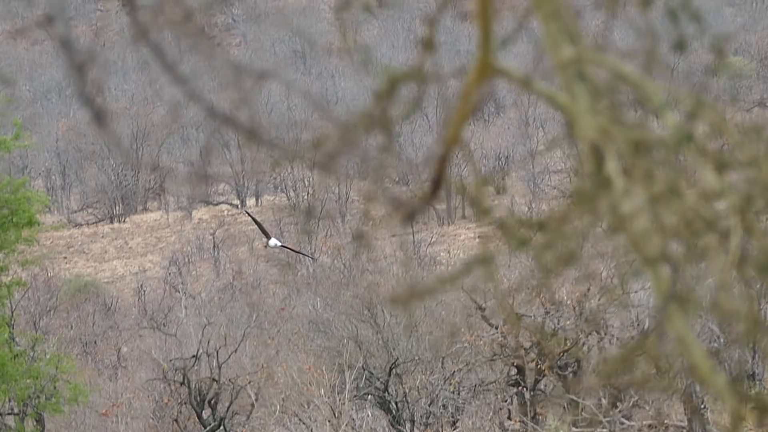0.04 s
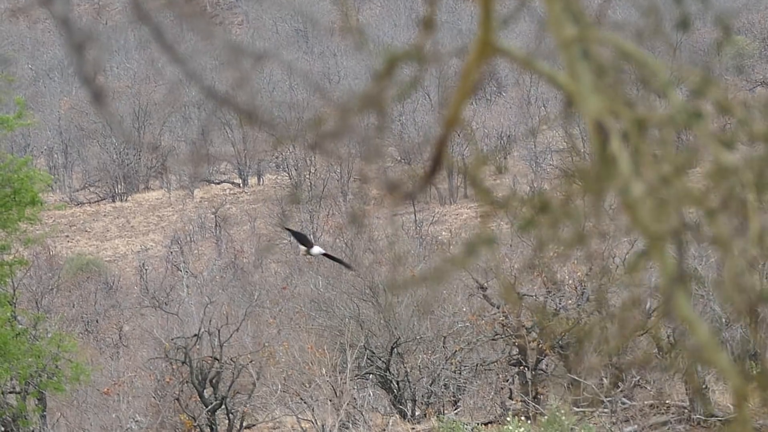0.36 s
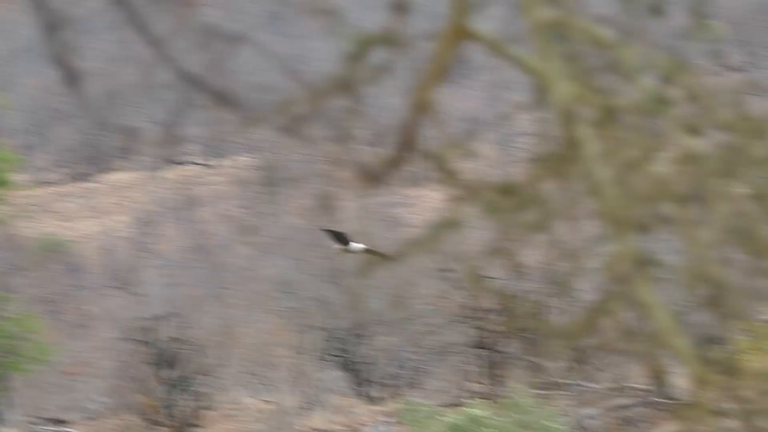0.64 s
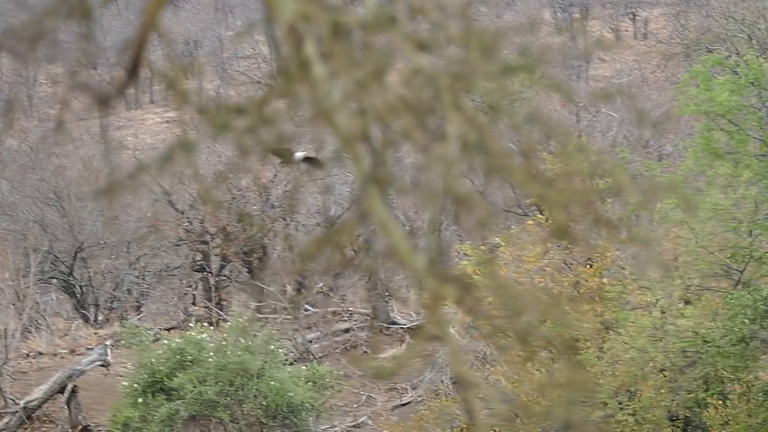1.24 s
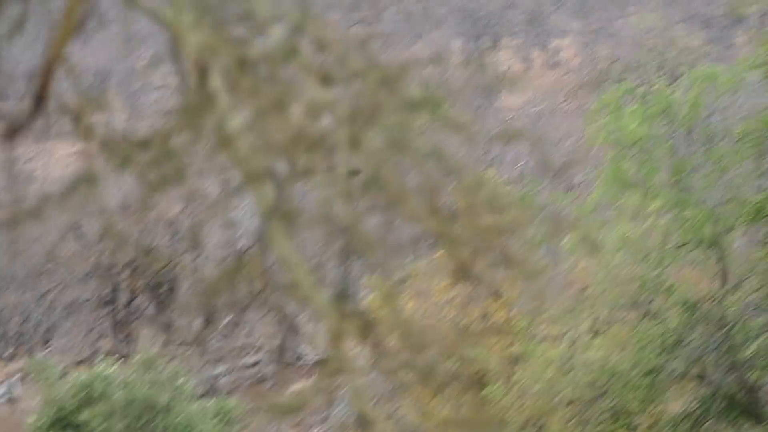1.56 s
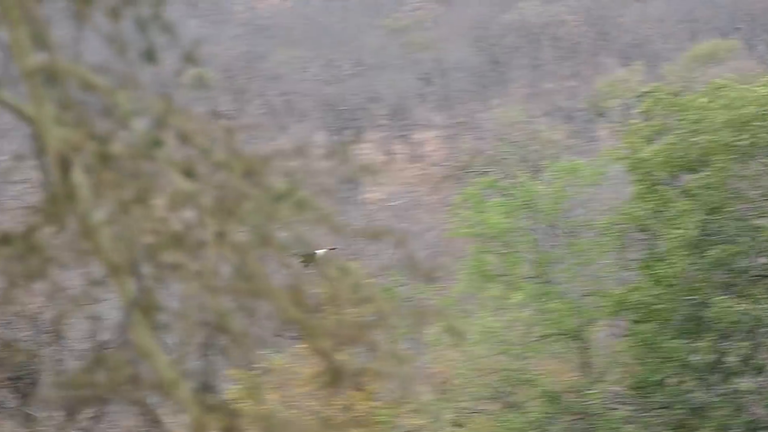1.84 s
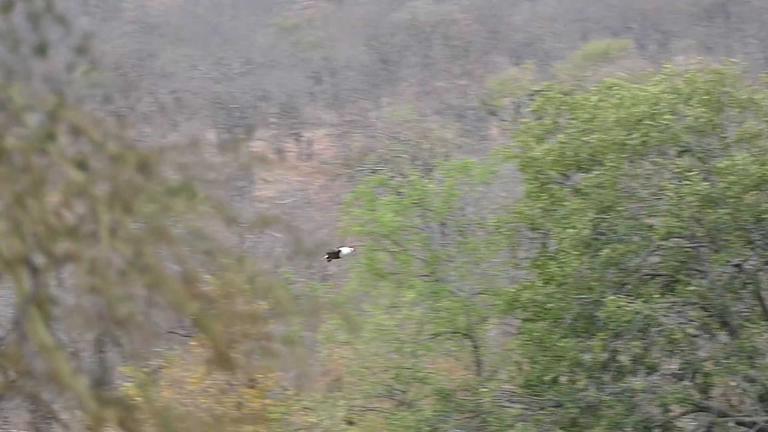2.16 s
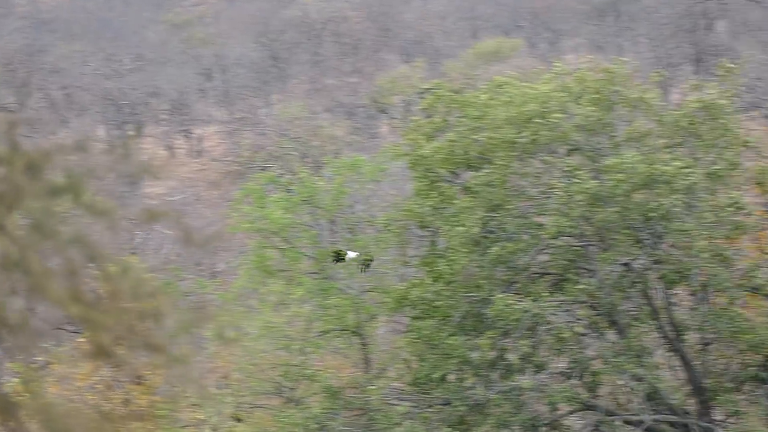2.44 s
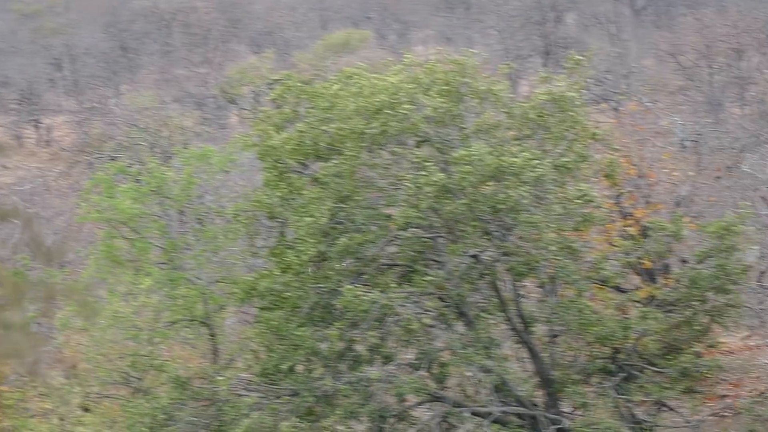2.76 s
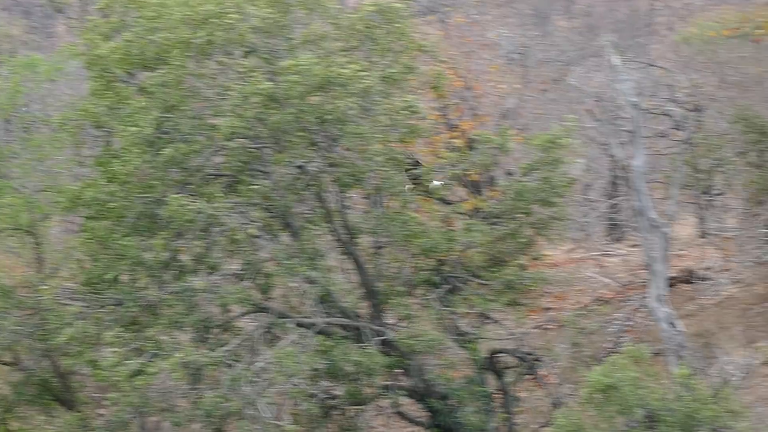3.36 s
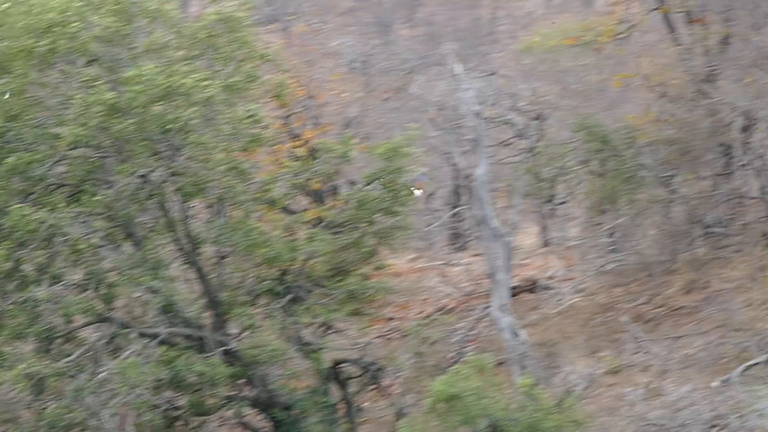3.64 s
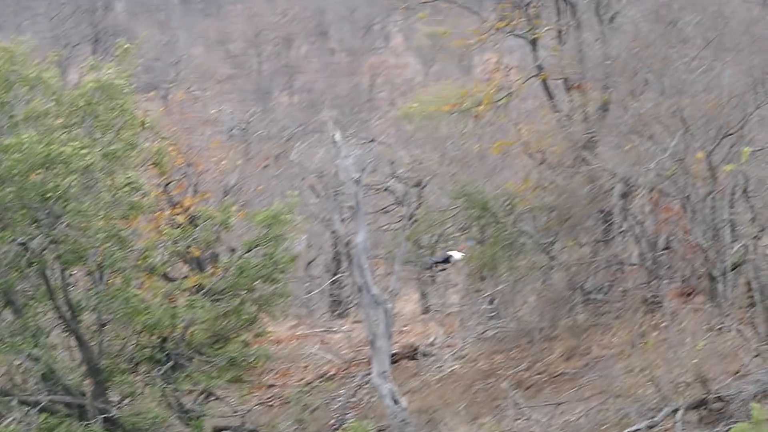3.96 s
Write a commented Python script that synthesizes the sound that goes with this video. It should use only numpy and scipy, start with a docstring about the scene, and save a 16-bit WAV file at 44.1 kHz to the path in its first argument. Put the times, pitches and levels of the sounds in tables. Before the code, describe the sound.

Small birds chirping and whistling in short bursts outdoors, above faint wind or traffic.

```python
"""Dry bush, on a hand-held camera's microphone. Close by, small birds twitter: quick falling chips and
louder rising whistles, nearly pure tones scattered by the trees. Fainter birds chatter behind them.
Far off are a few low hoots and a steady rush, wind or traffic, that swells a little towards the end.
Something dry ticks nearby, and the camera is softly bumped and scuffed. Only a faint hiss has
stereo width; the camera's filters cut two narrow bands and the top."""
import sys
import numpy as np
from scipy import signal
from scipy.fft import rfft, irfft
from scipy.io import wavfile
from scipy.ndimage import map_coordinates

SR = 44100
rng = np.random.default_rng(int(sys.argv[2]) if len(sys.argv) > 2 else 0)


def wav_record(signal):
    """Record a signal, one row per channel, as 16-bit PCM in the file named by sys.argv[1]."""
    frames = np.transpose(np.atleast_2d(signal))
    bounded = np.clip(frames, -1, 1)
    # unit amplitude maps onto the largest positive 16-bit level
    quanta = np.round(bounded * 32767).astype(np.int16)
    wavfile.write(sys.argv[1], SR, quanta)


N = 176400


def undb(db):
    """Decibels to gain."""
    return 10 ** (np.asarray(db) / 20)


def colour(x, points):
    """Filter by a curve of points: f/Hz, gain/dB."""
    hz, db = np.array(points).T
    bins_hz = np.maximum(np.fft.rfftfreq(N, 1 / SR), 1)
    return irfft(rfft(x) * undb(np.interp(np.log(bins_hz), np.log(hz), db)), N)


def noise():
    """White noise at 0 dB per Hz."""
    return rng.standard_normal(N) * np.sqrt(SR / 2)


def walk(rate_hz):
    """Smooth random motion with a spread of 1."""
    knots = rng.standard_normal(8192)
    motion = map_coordinates(knots, [np.arange(N) / SR * rate_hz], order=1, mode="mirror")
    return motion / motion.std()


def bell(peak_s, sigma_s):
    """A Gaussian rise and fall around a time."""
    return np.exp(-((np.arange(N) / SR - peak_s) / sigma_s) ** 2 / 2)


def add(out, start_s, sound):
    """Mix a sound in at a time."""
    i = int(np.clip(start_s * SR, 0, N))
    out[i:i + len(sound)] += sound[:N - i]


def progress(length_s):
    """0 to 1 over a note."""
    return np.linspace(0, 1, max(int(length_s * SR), 8))


def echoes(x, t60_s):
    """A diffuse tail of unit energy."""
    t = np.arange(SR) / SR
    tail = rng.standard_normal(SR) * np.exp(-np.log(1000) * t / t60_s) * (1 - np.exp(-t / 0.0025))
    return signal.fftconvolve(x, tail / np.linalg.norm(tail))[:N]


def bursts(events):
    """Noise that rises quickly and dies away, once for each row: t/s, decay/s, level/dB."""
    out = np.zeros(N)
    t = np.arange(SR // 4) / SR
    for start, decay, db in events:
        envelope = np.exp(-t / decay) * (1 - np.exp(-t / (0.09 * decay)))
        add(out, start, undb(db) * envelope * rng.standard_normal(len(t)))
    return out


def note(hz, attack=0.21, release=0.55, jitter=0.01, wobble_hz=260, flutter_db=2.5):
    """A slightly unsteady tone. Attack and release are shares of its length, jitter of its pitch."""
    u = np.linspace(0, 1, len(hz))
    position = np.arange(len(hz)) / SR * wobble_hz
    wobble, flutter = (np.interp(position, np.arange(128), r) for r in rng.standard_normal((128, 2)).T)
    fade_in = np.sin(np.pi / 2 * np.clip(u / attack, 0, 1))
    fade_out = np.sin(np.pi / 2 * np.clip((1 - u) / release, 0, 1))
    phase = 2 * np.pi * np.cumsum(hz * (1 + jitter * wobble)) / SR
    return fade_in * fade_out * undb(flutter_db * flutter) * np.sin(phase)


def chip(length_s, high_hz, low_hz, bend):
    """A quick downward slur: bend 1 is straight, over 1 flattens out, under 1 steepens."""
    u = progress(length_s)
    fall = 1 - (1 - u) ** bend if bend >= 1 else u ** (1 / bend)
    return note(high_hz + (low_hz - high_hz) * fall)


def faint_wide_hiss():
    """A faint hiss, independent left and right."""
    # hiss spectrum: f/Hz, level/dB per Hz
    spectrum = [(20, -120), (120, -115), (400, -104), (1500, -105), (3500, -110), (5000, -110),
                (7000, -120), (8200, -115), (9500, -107), (10500, -107), (12000, -113.5), (15500, -121)]
    return np.array([colour(noise(), spectrum) for _ in range(2)])


def distant_rush(bands=9, breath_db=0.23, flicker_db=1.08):
    """Far wind or traffic: octave bands breathe together and flicker alone; resonances swell and fade."""
    # steady spectrum: f/Hz, level/dB per Hz
    steady = [(20, -134), (70, -126), (125, -108), (165, -98.5), (270, -79), (380, -77), (460, -72.5),
              (700, -74), (820, -79.5), (1000, -79.5), (1170, -84.5), (1330, -79), (1520, -76.5),
              (1800, -80), (2130, -83), (2450, -93.5), (3300, -93.5), (4200, -86), (5700, -95),
              (7000, -109), (9500, -102.5), (12000, -113), (15000, -122)]
    # swelling bands: peak t/s, sigma/s, f/Hz, width/Hz, level/dB per Hz
    swells = [(0.32, 1, 1292, 200, -78), (.3, 0.81, 443, 55, -73), (1.76, 0.55, 786, 240, -77.5),
              (1.95, 0.25, 1570, 370, -82), (4.16, 0.74, 676, 198, -70.5), (3.64, 0.89, 523, 65, -73),
              (4.33, 0.8, 1690, 720, -79.5), (3.88, 0.48, 4400, 1630, -87.5),
              (3.85, 0.41, 9500, 2400, -105)]
    spectrum = rfft(colour(noise(), steady))
    breath = breath_db * walk(2.63)
    bins_hz = np.maximum(np.fft.rfftfreq(N, 1 / SR), 1)
    octave = np.clip(np.log2(bins_hz / 50), 0, bands - 1)
    out = np.zeros(N)
    for k in range(bands):
        band = irfft(spectrum * np.maximum(1 - abs(octave - k), 0), N)
        out += band * undb(breath + flicker_db * walk(14))
    for peak, sigma, hz, width, db in swells:
        bandpass = signal.butter(2, [hz - width / 2, hz + width / 2], "band", fs=SR, output="sos")
        out += undb(db) * bell(peak, sigma) * signal.sosfilt(bandpass, noise())
    return out


def midrange_dip(x, hz=1095, width_hz=200, depth=0.68):
    """A narrow band in the middle fades and comes back."""
    band = signal.lfilter(*signal.iirpeak(hz, hz / width_hz, fs=SR), x)
    return x - depth * bell(peak_s=1.4, sigma_s=0.44) * band


def far_hoots():
    """Short low calls from far off, some clear and some hoarse, with a little echo."""
    # hoots: centre t/s, length/s, f/Hz, jitter/share of pitch, level/dB
    calls = [(0.276, 0.033, 1210, .008, -40), (0.284, 0.058, 764, 0.009, -39.5),
             (1.86, .042, 872, .11, -42), (1.863, .018, 1360, 0.13, -44.5), (2.307, .036, 660, .037, -43.5)]
    out = np.zeros(N)
    for centre, length, hz, jitter, db in calls:
        hoot = note(np.full_like(progress(length), hz), attack=0.43, release=0.42, jitter=jitter)
        add(out, centre - length / 2, undb(db) * hoot)
    return out + undb(-3) * echoes(out, t60_s=0.083)


def far_chatter(count=100, centre_hz=4234, level_db=-60.5):
    """Faint chips from the rest of the flock, further back in the bush."""
    out = np.zeros(N)
    for k, (shift, stretch, pitch, loudness) in enumerate(rng.uniform(-1, 1, (count, 4))):
        hz = centre_hz * (1 + 0.1023 * pitch)
        call = chip(0.0349 * (1 + stretch / 2), hz, hz * 0.94, bend=1.39)
        add(out, (k + shift) / count * N / SR, undb(level_db + 3.2 * loudness) * call)
    return out


def dry_ticks():
    """Something dry ticks near the microphone: short, bright bursts of noise."""
    # ticks: t/s, decay/s, level/dB before colouring
    ticks = [(.044, .005, -56), (.318, .006, -55), (.378, .01, -59), (1.277, .02, -58),
             (1.348, .006, -56.5), (1.528, 0.036, -61), (1.618, .011, -57.5), (1.663, .01, -61),
             (1.715, .014, -56.5), (1.856, .02, -63), (2.972, 0.0054, -53), (3.002, 0.0048, -50),
             (3.074, .007, -55.5)]
    # their bright colour: f/Hz, gain/dB
    bright = [(3000, -25), (6000, -4), (7200, -6.5), (9500, 10.5), (12000, 0), (15500, -22)]
    return colour(bursts(ticks), bright)


def camera_bumps(decay_s=0.015):
    """Soft knocks on the camera body reach the microphone as dull thuds."""
    # knocks: t/s, level/dB before colouring
    knocks = [(3.450, -48), (3.503, -53), (3.522, -57)]
    # their dull colour: f/Hz, gain/dB
    dull = [(30, -25), (75, -5), (125, 15), (190, 24.5), (260, 24), (400, -5), (1500, -50)]
    return colour(bursts((start, decay_s, db) for start, db in knocks), dull)


def grip_scuffs():
    """The hand rubs briefly on the grip, right by the microphone."""
    # scuffs: t/s, decay/s, level/dB before colouring
    scuffs = [(3.538, 0.012, -52.5), (3.554, 0.0076, -51.5)]
    # their hissy colour: f/Hz, gain/dB
    hissy = [(2500, -30), (5500, 10), (7000, 4), (9500, 2.5), (13000, -20)]
    return colour(bursts(scuffs), hissy)


def trees(x):
    """A short hazy smear, blurred in pitch, follows each note; trunks add a fainter, longer tail."""
    haze = echoes(x * walk(840), t60_s=0.22)
    trunks = echoes(x, t60_s=0.3)
    return x + undb(-11.5) * haze + undb(-20.5) * trunks


def branches(sound, count=3, reflection_db=-15):
    """A note also reaches the microphone by way of a few branches; the copies beat against its glide."""
    direct = np.pad(sound, (0, SR // 20))
    delays_s = rng.uniform(0.0024, 0.011, count)
    return direct + undb(reflection_db) * sum(np.roll(direct, int(delay * SR)) for delay in delays_s)


def near_scratches(length_s=0.015):
    """Tiny notes from the near birds, made scratchy by fast, wide pitch jitter."""
    # scratchy notes: centre t/s, f/Hz, level/dB
    calls = [(.672, 5400, -55), (1.020, 4850, -50), (1.29, 5300, -49.5), (1.286, 4900, -50),
             (1.573, 3590, -48), (1.590, 4440, -43), (1.607, 4640, -45), (1.617, 4780, -48),
             (1.640, 4180, -50), (1.880, 4980, -52), (2.264, 4215, -43.5), (2.316, 4300, -48),
             (2.982, 5300, -48), (3.001, 5450, -47), (3.798, 5600, -52), (3.804, 4220, -48),
             (3.816, 5650, -46.5), (3.835, 5600, -53)]
    out = np.zeros(N)
    for centre, hz, db in calls:
        pitch = np.full_like(progress(length_s), hz)
        scratch = note(pitch, attack=0.58, release=0.44, jitter=0.068, wobble_hz=965)
        add(out, centre - length_s / 2, undb(db) * scratch)
    return out


def near_rasps():
    """Rough falling slurs that close the loud whistles."""
    # rasps: t/s, length/s, start f/Hz, end f/Hz, level/dB
    calls = [(0.671, 0.03, 4980, 3580, -41.5), (1.288, 0.032, 4830, 3640, -40),
             (1.884, .023, 4660, 3500, -40.5)]
    out = np.zeros(N)
    for start, length, high, low, db in calls:
        slur = low + (high - low) * (1 - progress(length)) ** 1.8
        add(out, start, undb(db) * branches(note(slur, jitter=0.026, wobble_hz=690)))
    return out


def near_chips():
    """Quick falling chips from the birds closest to the microphone."""
    # chips: t/s, length/s, start f/Hz, end f/Hz, bend, level/dB
    calls = [(.054, .04, 5600, 4600, .94, -54), (.148, .048, 5680, 4400, 1.3, -53),
             (.248, 0.038, 4450, 3560, 1.5, -47.5), (.358, 0.042, 4480, 3440, 0.8, -46.5),
             (.466, .026, 5300, 4300, 1, -49), (.522, 0.022, 5080, 4520, 1.1, -47.5),
             (.540, 0.041, 4450, 3540, 1.1, -45), (.880, 0.05, 4420, 3440, 1.3, -54),
             (1.030, 0.013, 4420, 3690, 1.12, -48), (1.544, 0.016, 4480, 3090, 0.56, -45),
             (1.569, 0.021, 6100, 4500, 0.86, -55), (1.606, 0.02, 5550, 5350, .8, -47),
             (1.637, 0.037, 3640, 3170, 1.8, -56), (1.683, 0.026, 5450, 4600, 1.3, -55),
             (1.71, 0.038, 5650, 4370, 2.3, -47), (1.752, 0.06, 4600, 3780, 0.41, -43.5),
             (1.860, .026, 4520, 4200, 1.5, -43.5), (1.901, .023, 4040, 3540, 0.91, -49),
             (2.218, 0.041, 4370, 3700, 1.3, -53), (2.366, .052, 5530, 3600, 0.82, -58),
             (2.843, 0.041, 4650, 3380, .95, -45), (2.956, 0.039, 4570, 3410, 1.17, -42.5),
             (3.065, 0.038, 5550, 3990, 1.5, -41.5), (3.127, 0.063, 5300, 3680, 2.24, -43.5),
             (3.263, .022, 5500, 4350, 1.5, -53), (3.286, 0.043, 4680, 3900, 0.98, -48),
             (3.340, 0.066, 4760, 4116, 2.8, -50), (3.401, 0.049, 4100, 4020, 1.9, -55),
             (3.474, 0.043, 4100, 3390, 1, -52.5), (3.500, 0.026, 5750, 5150, 1.2, -54),
             (3.560, 0.038, 4980, 4970, 1.1, -50.5), (3.686, 0.061, 4380, 3500, 0.65, -45.5)]
    out = np.zeros(N)
    for start, length, high, low, bend, db in calls:
        add(out, start, undb(db) * branches(chip(length, high, low, bend)))
    return out


def near_whistles(fade_db=2.5):
    """The loudest calls, close by: the pitch climbs in an S and the tone loses level on the way up."""
    # whistles: t/s, length/s, low f/Hz, high f/Hz, top of the climb/share of note, level/dB
    calls = [(0.576, 0.073, 3904, 4790, 0.76, -34), (1.196, .067, 3900, 4720, .9, -36.5),
             (1.786, 0.06, 4010, 4630, 0.95, -35), (2.254, 0.069, 4150, 4950, 1.08, -46),
             (2.418, 0.039, 4040, 4460, 0.63, -54), (1.565, 0.02, 3950, 4490, .8, -48),
             (1.619, 0.0164, 3750, 4250, .9, -45.5)]
    bottom = 0.166  # share of the note at which the pitch is lowest
    out = np.zeros(N)
    for start, length, low, high, top, db in calls:
        rise = (1 - np.cos(np.pi * (progress(length) - bottom) / (top - bottom))) / 2
        whistle = note(low + (high - low) * rise, attack=0.54, release=0.12, jitter=0.0058)
        add(out, start, undb(db) * branches(undb(-fade_db * rise) * whistle))
    return out


def scene():
    """Birds, distance and small noises sit in the centre; only the faint hiss has stereo width."""
    near_birds = near_chips() + near_whistles() + near_rasps() + near_scratches()
    flock = trees(near_birds + far_chatter())
    distance = far_hoots() + midrange_dip(distant_rush())
    small_noises = dry_ticks() + camera_bumps() + grip_scuffs()
    return flock + distance + small_noises + faint_wide_hiss()


def record(dry, top_hz=15500):
    """The camera notches out two narrow bands and cuts the top."""
    # camera notches: f/Hz, width/Hz
    notches = [(582, 98), (2685, 320)]
    for hz, width in notches:
        dry = signal.lfilter(*signal.iirnotch(hz, hz / width, fs=SR), dry)
    lowpass = signal.ellip(10, 0.2, 80, top_hz, fs=SR, output="sos")
    return signal.sosfilt(lowpass, dry)


dry = scene()
out = record(dry)
wav_record(out)
```